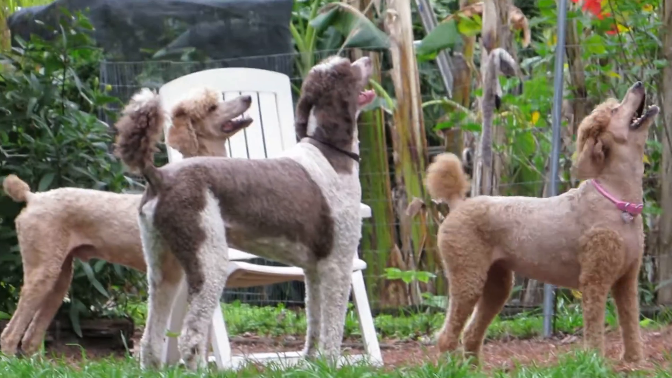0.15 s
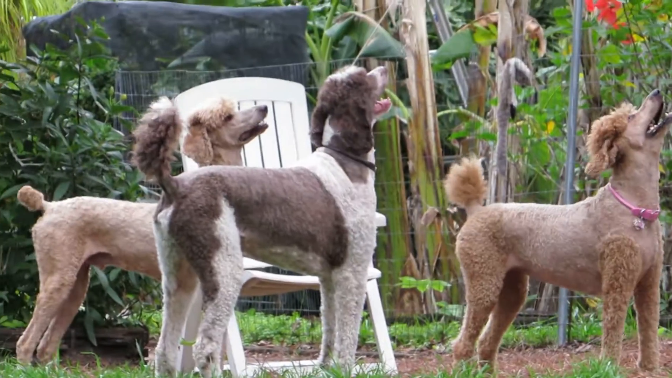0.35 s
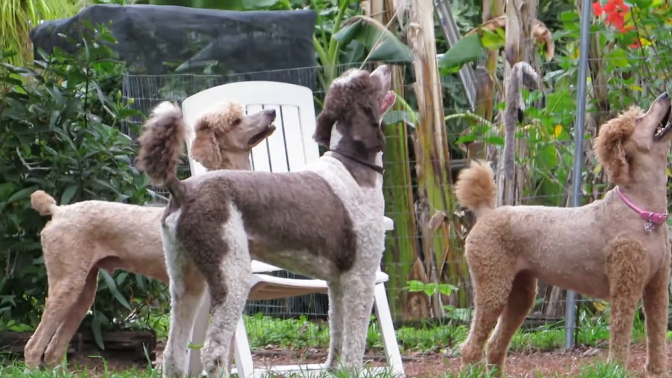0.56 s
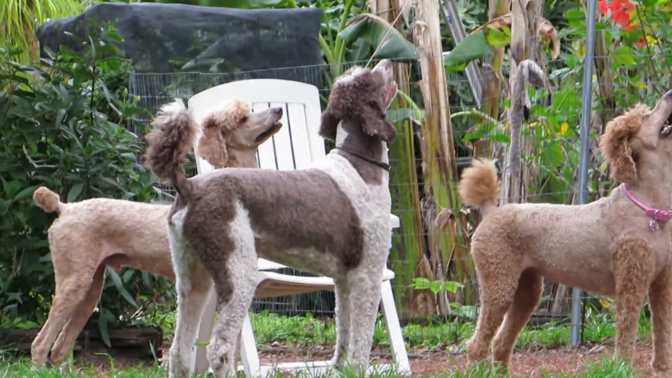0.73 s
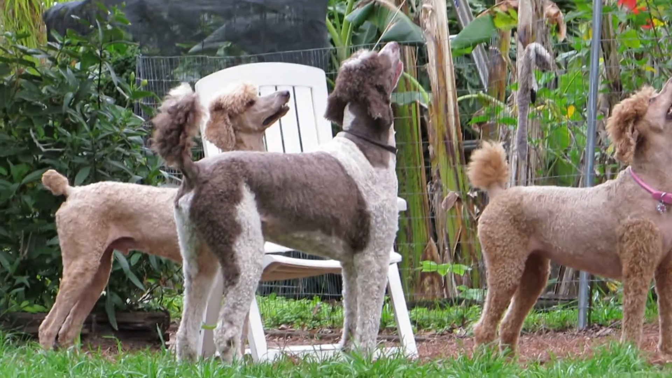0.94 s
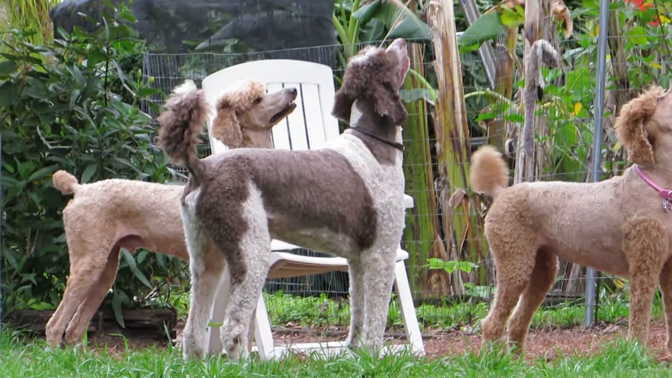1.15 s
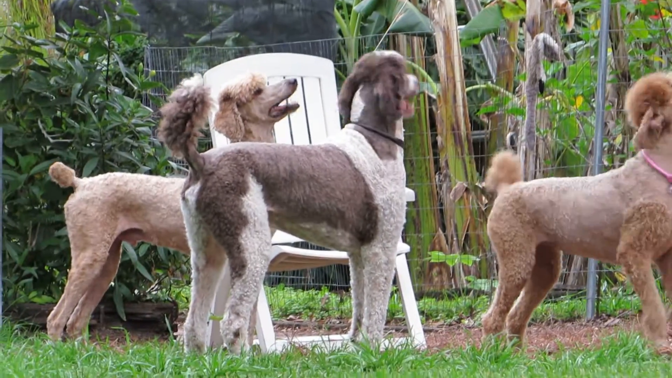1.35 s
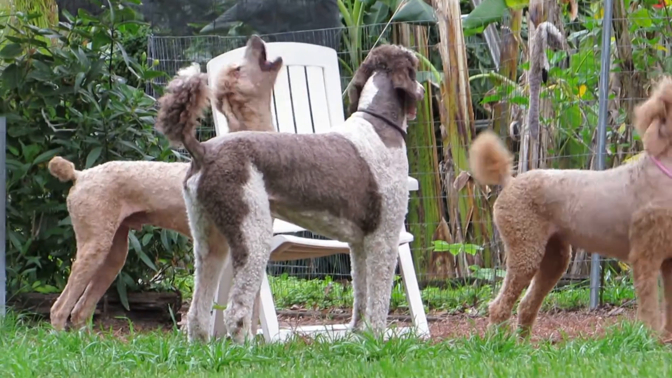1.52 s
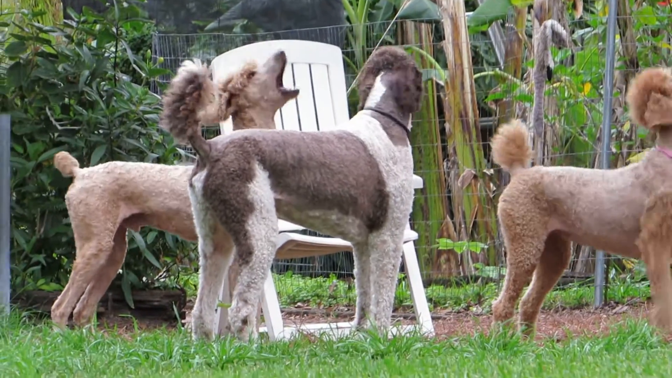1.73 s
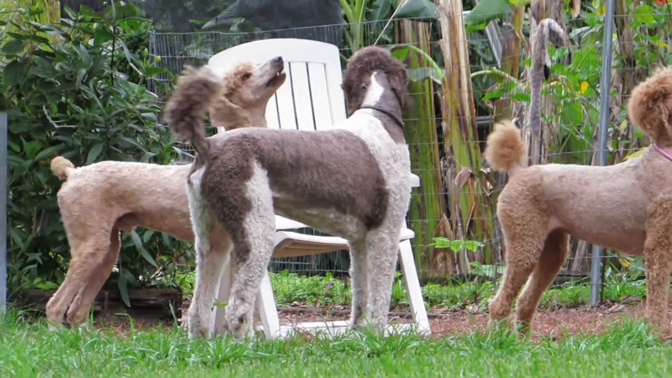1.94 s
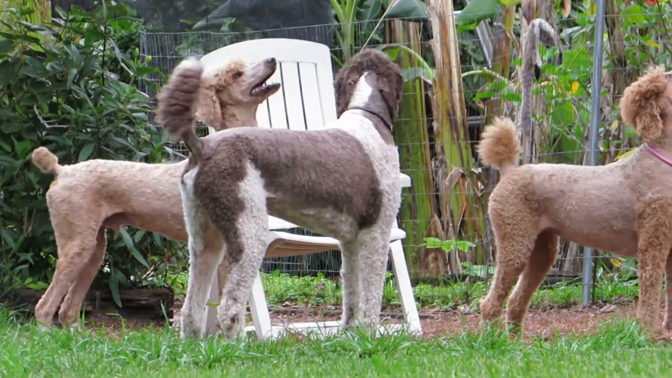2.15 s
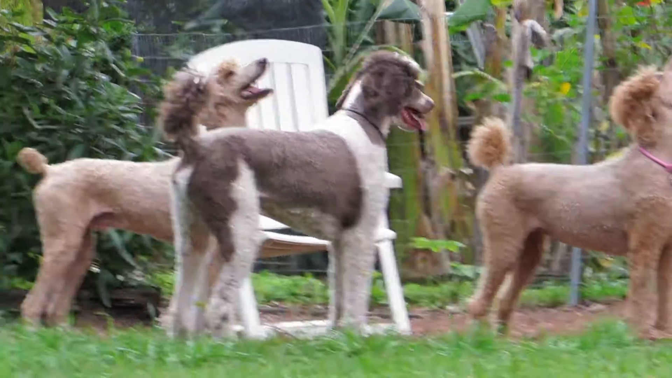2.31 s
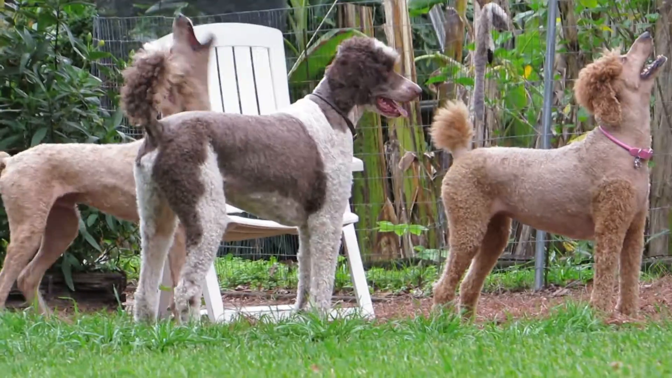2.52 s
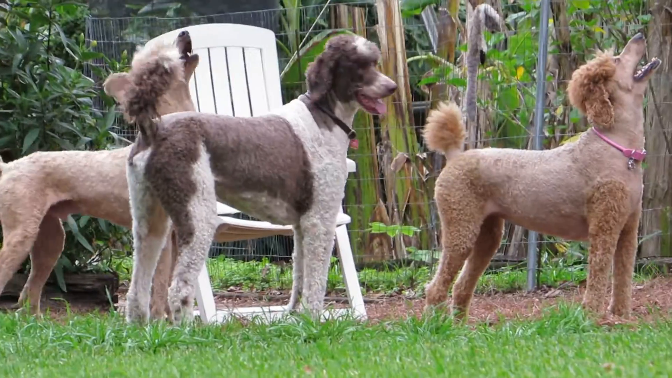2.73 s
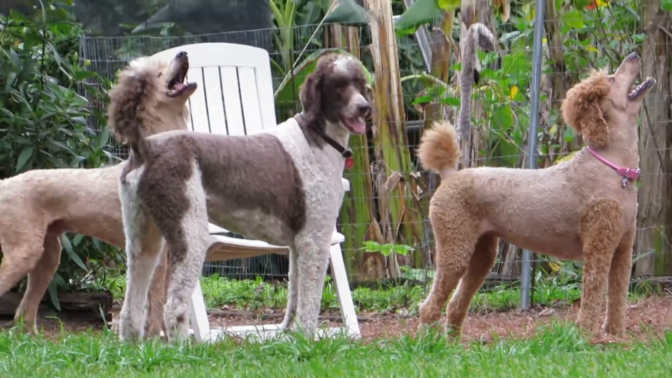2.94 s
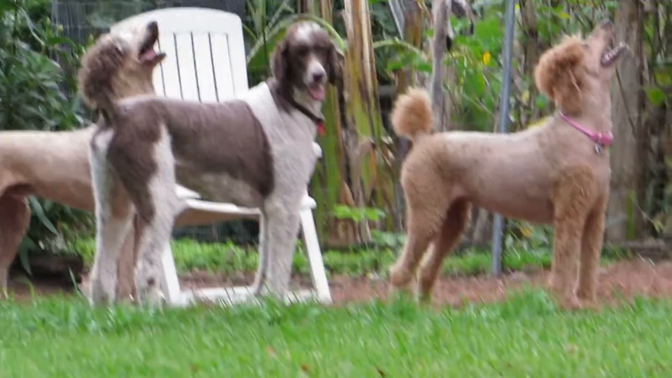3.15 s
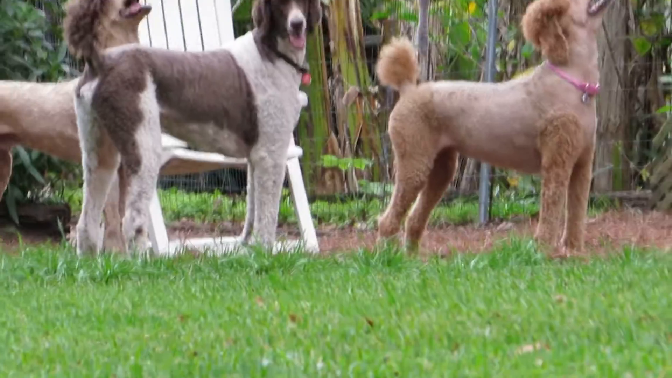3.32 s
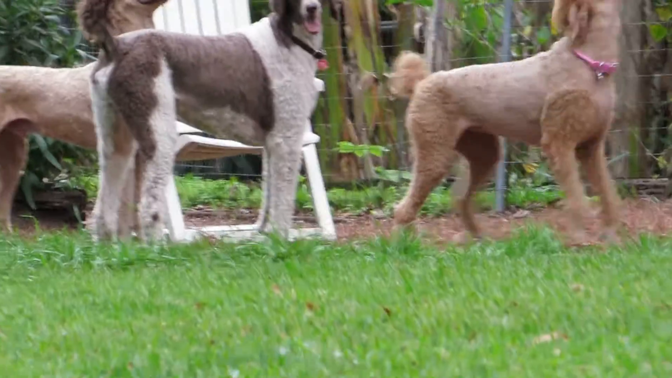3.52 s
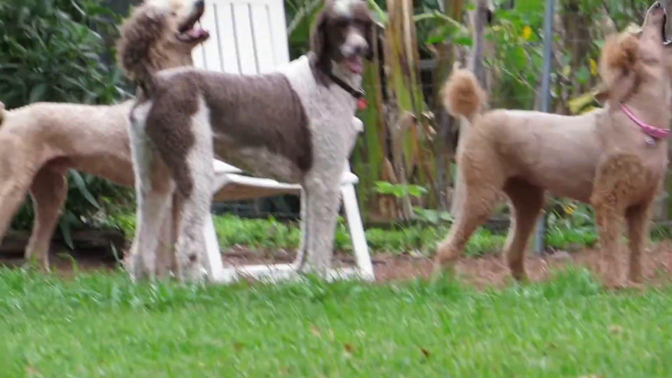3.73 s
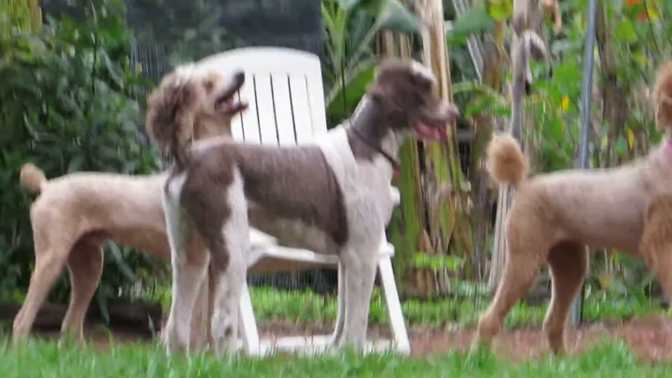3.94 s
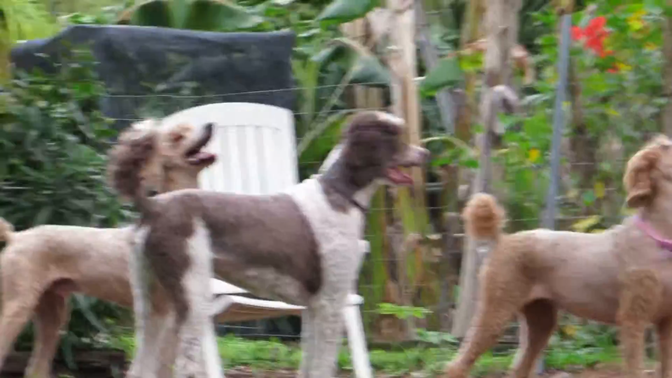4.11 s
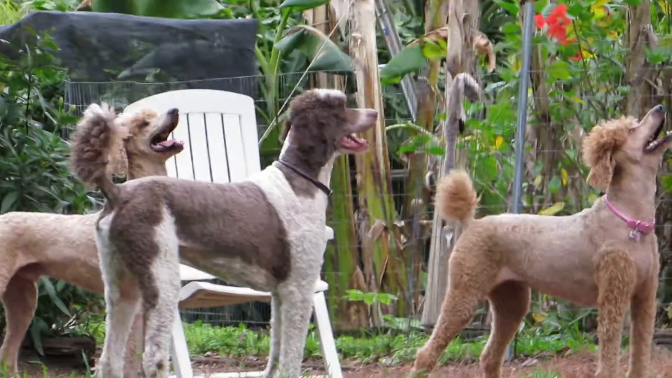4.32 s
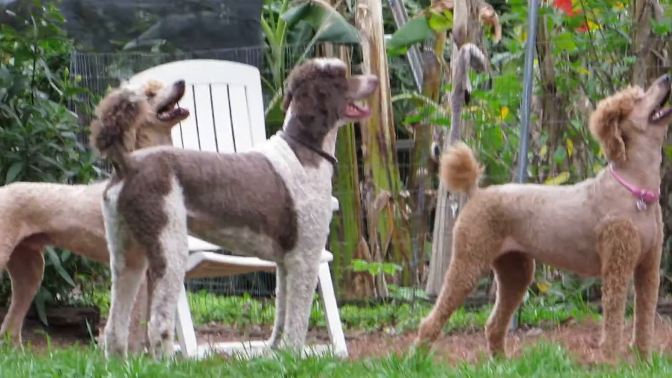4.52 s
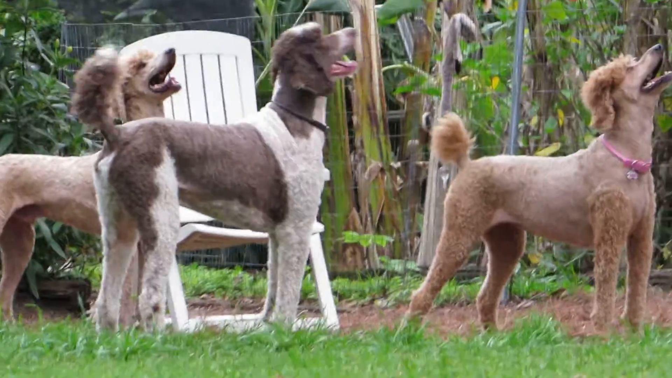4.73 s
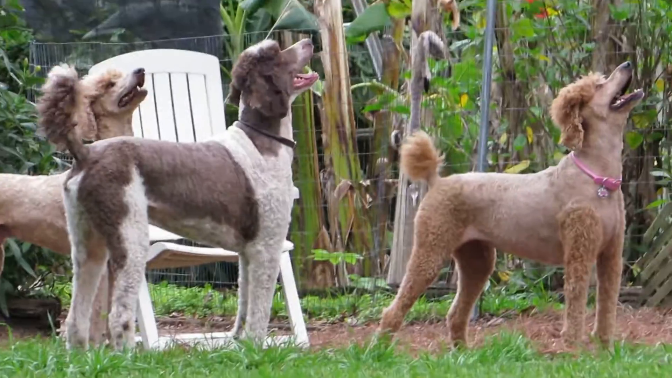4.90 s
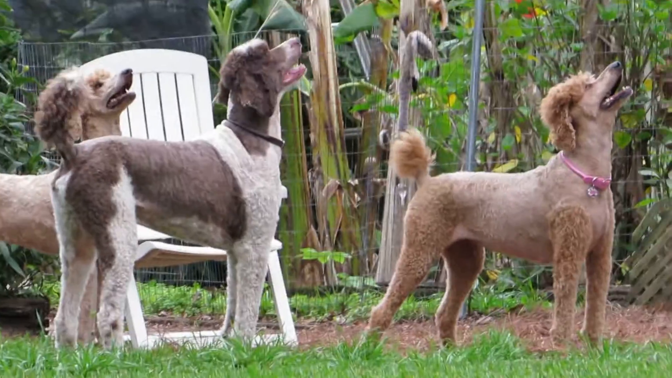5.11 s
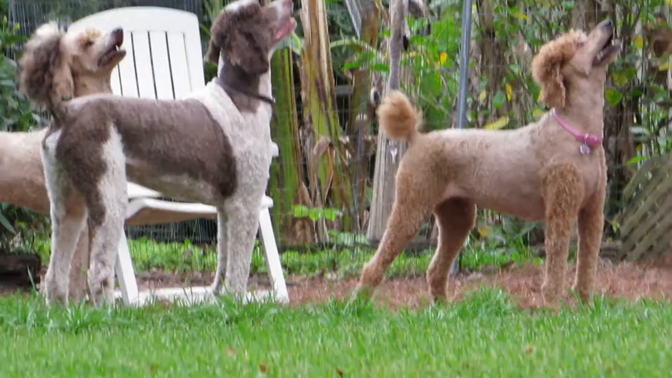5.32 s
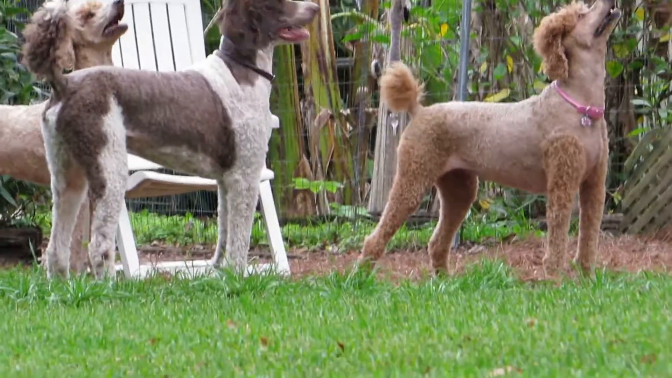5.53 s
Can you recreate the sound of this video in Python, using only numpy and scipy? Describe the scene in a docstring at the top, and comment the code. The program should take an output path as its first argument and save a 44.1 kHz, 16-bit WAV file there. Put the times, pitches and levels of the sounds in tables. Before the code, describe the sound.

A few short barks and yelps from dogs outdoors, with squeaky whining, faint bird chirps and far traffic behind.

```python
"""A fenced garden: small dogs give hoarse barks, high yelps and thin nasal whines, with a few knocks.
Barks and yelps are uneven vocal-fold pulses shaped by the throat; whines are gliding whistles.
Fences and house walls throw the calls back. Behind them: a far engine, traffic, leaves, a breeze,
insects and a songbird. Automatic gain control ducks on the loud calls and recovers slowly."""
import sys
import numpy as np
from scipy import signal
from scipy.fft import rfft, irfft, next_fast_len
from scipy.io import wavfile
from scipy.ndimage import uniform_filter1d, map_coordinates

SR = 44100
rng = np.random.default_rng(int(sys.argv[2]) if len(sys.argv) > 2 else 0)


def digitize_waveform(pressure):
    """Quantize a signal to 16-bit integers and store it at the path in sys.argv[1].

    Rows of a 2-D input are taken as channels; values are limited to [-1, 1].
    """
    field = np.atleast_2d(pressure).T
    bounded = np.clip(field, -1, 1)
    quanta = np.round(bounded * 32767).astype(np.int16)
    wavfile.write(sys.argv[1], SR, quanta)


N = 245195
TIME_S = np.arange(N) / SR
CUTOFF_HZ = 14700

# barks: start_s, attack_s, hold_s, level_db, climb_s, break_s, top_hz, low_hz, rough_before, rough_after
BARKS = [(-.03, .02, 0.084, -28.5, 0.019, 0.014, 580, 502.4, .5, 0.5),
         (1.285, 0.047, .05, -11.5, .037, .014, 620, 509.8, 0.89, 0.36),
         (2.554, 0.043, 0.061, -4.5, 0.03144, .045, 671.1, 573.6, 0.18, 0.87),
         (3.514, .038, .056, -9, .033, .018, 726, 531, .14, .58),
         (3.842, .046, 0.044, -12.5, .026, .014, 657, 509.2, 0.88, 0.42)]
# mouth resonances, one list per bark: centre_hz, width_hz, boost_db
BARK_MOUTHS = [
    [(546, 47, 8), (912, 53, 16.5), (1554, 36, 15), (5000, 900, 0)],
    [(955, 110, 12.5), (1620, 65, 2), (1910, 170, 6), (5200, 550, 7.5)],
    [(647, 90, 9.5), (1086, 82, 17.5), (1453, 234, 20), (1950, 250, 2.5), (2797, 62, 16), (4640, 1020, 17),
     (11770, 3000, 9.5)],
    [(500, 120, -6), (746, 110, 0), (990, 180, 16), (1980, 1100, 2.5), (5400, 660, 6)],
    [(934, 62, 15), (1577, 60, 7), (2860, 140, 7), (4970, 260, 10)],
]
# throat response in a bark: freq_hz, gain_db
BARK_THROAT = [(350, -41), (425, -12.5), (500, -8.5), (700, -1), (1100, 0.5), (1600, -0.5), (2150, -1.5),
               (2550, -13.5), (2900, -18), (3700, -33), (5000, -30.5), (6500, -33.5), (8500, -44.5),
               (10500, -44.5), (14000, -55)]
# engine firing tone: time_s, level_db
FIRING_LEVEL = [(0.03, -35.5), (0.29, -51.5), (0.5, -31.5), (0.63, -42), (1.09, -31.5), (1.19, -44),
                (1.44, -33), (1.72, -50), (1.84, -43), (2.11, -45.5), (2.31, -36), (2.6, -44), (3.4, -39),
                (3.51, -33), (3.58, -38), (3.87, -37), (4.21, -56), (4.56, -34), (5.02, -38), (5.07, -59),
                (5.1, -33), (5.53, -34)]
# octave of the firing tone: time_s, level_db
OCTAVE_LEVEL = [(0.03, -45), (0.21, -62), (0.29, -47), (1.5, -38.5), (1.7, -47), (2.54, -38), (2.59, -39.5),
                (2.8, -61), (3.14, -44), (4.49, -51), (5.13, -39.5), (5.38, -49.5), (5.53, -36.5)]
# open-air spectrum: freq_hz, gain_db
AIR_SPECTRUM = [(25, -5), (60, 1.5), (110, 7), (190, -3), (400, -11), (800, -4), (1400, -10.5), (2000, -16),
                (3000, -18.5), (5000, -26), (7500, -28.5), (10500, -31), (12500, -36.5), (14500, -45)]
# left-right likeness of the open air: freq_hz, coherence
AIR_COHERENCE = [(30, 0.33), (90, .75), (250, 0.06), (900, 0.42), (2000, 0.37), (4000, 0.073),
                 (9000, 0.032)]
# far traffic swell: time_s, level_db
TRAFFIC_LEVEL = [(0, -61), (.9, -54), (1.35, -46.5), (1.8, -55), (2.4, -48.5), (3.0, -55), (3.9, -48.5),
                 (4.3, -54), (4.75, -43), (5.1, -50), (5.56, -55.5)]
# songbird chirps: start_s, length_s, first_hz, last_hz, level_db
CHIRPS = [(0.142, 0.057, 3810, 3480, -50.5), (0.246, 0.049, 3860, 3670, -53),
          (0.54, 0.034, 2977, 3260, -56), (0.603, 0.073, 3350, 3610, -59), (0.937, 0.09, 2967, 3410, -56),
          (2.392, 0.039, 3694, 3460, -52), (3.162, 0.12, 3740, 3230, -51.5)]
# yelps: start_s, attack_s, hold_s, level_db, sag_db_per_s, glide_s,
# first_hz, held_hz, last_hz, onset_rough, overtones_db
YELPS = [(1.526, 0.044, 0.036, -7.5, 26, 0.082, 896, 1387, 1363, 0.6, -3),
         (1.816, .04, .03, -12, 62, .054, 1174, 1424, 1368, 0, -1),
         (4.69, .032, .06, -19, 110, 0.0694, 1372, 1363, 1227, 0.02, 3)]
# throat response in a yelp: freq_hz, gain_db
YELP_THROAT = [(350, -54), (620, -1), (850, -2.5), (1200, 7.5), (1500, 8), (1800, -6), (2300, 6.5),
               (2750, -26), (3700, -26), (4900, -27), (7000, -32), (9500, -45.5), (13500, -44.5)]
# whines: start_s, rise_s, fall_s, first_hz, middle_hz, last_hz, level_db, overtones_db
WHINES = [(1.755, 0.044, 0.043, 2190, 2200, 2280, -51.5, 3.5),
          (1.899, 0.044, 0.029, 3410, 3365, 3200, -61.5, 12.5),
          (1.914, 0.016, .035, 3370, 2890, 2590, -43.5, -15),
          (2.05, 0.022, 0.044, 3876, 3730, 3520, -52, -11),
          (2.06, 0.013, 0.028, 1268, 1221, 1150, -37.5, -11),
          (2.126, 0.023, 0.06, 1130, 1080, 917, -32.5, -7),
          (2.15, 0.023, 0.025, 3370, 3150, 2550, -43.5, -22),
          (2.457, .03, 0.047, 2800, 2920, 2700, -65.5, 10),
          (2.968, 0.019, 0.015, 2800, 2630, 2566, -50, -22),
          (3.221, 0.018, 0.029, 2550, 2776, 2640, -41.5, -13),
          (3.733, 0.049, 0.035, 2940, 2840, 2820, -31, -15), (4.34, .065, 0.062, 2697, 3100, 3640, -37, -7),
          (4.458, 0.019, .05, 3730, 3400, 2704, -35, -5), (4.599, 0.049, 0.038, 2550, 2693, 2810, -42, -10),
          (4.635, 0.069, 0.074, 3480, 3480, 3315, -54.5, 9.5),
          (4.689, 0.047, 0.079, 2720, 2740, 2520, -55, 2), (4.784, .02, .02, 2826, 3200, 3800, -36.5, -22),
          (4.804, 0.026, 0.025, 3340, 3160, 2620, -44, -10),
          (4.809, 0.058, 0.14, 2720, 2510, 2420, -53, -1), (5.1, 0.029, .02, 2330, 2410, 2890, -47, -16),
          (5.39, 0.043, 0.045, 2600, 2420, 2040, -53, -27)]
# overtone balance of a whine: harmonic, gain_db
WHINE_OVERTONES = [(2, -1), (3, -18), (4, -18.5)]
# knocks, snaps and ticks from the dogs: start_s, level_db, ring_hz, width_hz, t60_s
KNOCKS = [(1.995, -37.5, 228, 120, 0.25), (3.853, -23, 1317, 1500, 0.0065), (3.87, -41, 8400, 9000, 0.011),
          (4.212, -40.5, 6850, 8900, 0.008), (4.257, -56, 6044, 7000, 0.009)]
# sharp reflections: delay_s, level_db, left_minus_right_db
ECHOES = [(.0042, -26, 26), (.017, -13.5, 7), (0.03, -13.5, -6), (.066, -15, -5.5), (0.096, -33, -3.5)]
# scatter from fences, house and far gardens: delay_s, level_db, build_s, t60_s
SCATTER = [(.003, -6, 0.0021, 0.31), (0.068, -13, 0.0021, 0.63), (.2, -28.5, .05, 1.36)]
# scatter spectrum: freq_hz, gain_db
SCATTER_SPECTRUM = [(300, -14.5), (500, 14), (1000, -2), (1500, 4), (2500, 0.5), (5000, 3), (14000, 9.5)]
# left-right likeness of the scatter: freq_hz, coherence
SCATTER_COHERENCE = [(400, 0.65), (1500, 0.8), (3000, 0.71), (6000, 0.41), (14000, .1)]
# microphone notches: centre_hz, width_hz
MIC_NOTCHES = [(3960, 300), (7930, 190)]


def from_db(db):
    """Decibels to gain."""
    return 10 ** (np.asarray(db) / 20)


def pan(left_db):
    """Stereo gains: left up by left_db, right down by as much."""
    return from_db([[left_db], [-left_db]])


def unit_rms(x):
    """Scale to rms 1."""
    return x / np.sqrt(np.mean(x ** 2) + 1e-20)


def over_time(points):
    """A (time_s, value) table, read at every sample."""
    return np.interp(TIME_S, *np.transpose(points))


def over_bins(points, n):
    """A (freq_hz, value) table, read on a log axis at the FFT bins of n samples."""
    freq_hz, value = np.transpose(points)
    bin_hz = np.arange(n // 2 + 1) * SR / n
    return np.interp(np.log(bin_hz + 1), np.log(freq_hz), value)


def colour(x, spectrum):
    """Filter by a (freq_hz, gain_db) table."""
    n = next_fast_len(x.shape[-1] + 2048)
    return irfft(rfft(x, n) * from_db(over_bins(spectrum, n)), n)[..., :x.shape[-1]]


def drift(n, rate_hz):
    """Smooth random curve, spread about 1."""
    place = np.arange(n) * rate_hz / SR
    return map_coordinates(rng.standard_normal(int(place[-1]) + 3), [place], order=3, mode="nearest")


def phase_of(pitch_hz):
    """Running phase in radians."""
    return 2 * np.pi * np.cumsum(pitch_hz) / SR


def resonance(x, hz, width_hz):
    """Two-pole resonator, peak gain 1."""
    r = np.exp(-np.pi * width_hz / SR)
    feedback = [1, -2 * r * np.cos(2 * np.pi * hz / SR), r * r]
    return signal.lfilter(np.array([1, 0, -1]) * (1 - r * r) / 2, feedback, x)


def stereo_noise(n, coherence):
    """White noise at two close microphones; likeness varies with frequency."""
    size = next_fast_len(n)
    mid, side = rfft(rng.standard_normal((2, size)))
    alike = over_bins(coherence, size)
    spectra = np.sqrt((1 + alike) / 2) * mid + np.sqrt((1 - alike) / 2) * side * [[1], [-1]]
    return irfft(spectra, size)[:, :n]


def fade(x):
    """Taper 3 ms at each end."""
    return x * signal.windows.tukey(len(x), min(1, .006 * SR / len(x)))


def at_level(x, level_db):
    """Flatten the running rms, then apply level_db."""
    power = uniform_filter1d(x ** 2, int(.012 * SR))
    return fade(x / np.sqrt(power + 1e-12)) * from_db(level_db)


def call_span(start_s, length_s):
    """A call's slice and its age_s at each sample."""
    span = slice(max(0, int(start_s * SR)), int((start_s + length_s) * SR))
    return span, np.maximum(TIME_S[span] - start_s, 0)


def breath_db(age_s, attack_s, hold_s, sag_db_per_s, release_s, shudder_db=2):
    """Breath pressure builds as a power of time, sags, shudders and is let go."""
    rise_db = 20 * np.log10(np.clip(age_s / attack_s, 1e-3, 1) ** 1.39)
    sag_db = sag_db_per_s * np.maximum(age_s - attack_s, 0)
    release_db = 18.5 * np.maximum(age_s - attack_s - hold_s, 0) / release_s
    return rise_db - sag_db - release_db + shudder_db * drift(len(age_s), 111.5)


def vocal_folds(pitch_hz, rough, jitter, shimmer, doubling, rasp, overtones_db=0):
    """Strain (rough, 0-1) makes cycles uneven, alternately strong and weak, and leaks puffs of air."""
    n = len(pitch_hz)
    phase = phase_of(pitch_hz * (1 + jitter * rough * drift(n, 492.3)))
    smear_rad = rng.uniform(0, 2 * np.pi, size=32)   # throat and muzzle delay each overtone differently
    tone = sum(np.cos(k * phase + smear_rad[k]) * (k * pitch_hz < CUTOFF_HZ)
               * from_db(overtones_db * (k > 1)) for k in range(1, 32))
    unevenness = shimmer * drift(n, 698.4) + doubling * np.cos(phase / 2)
    tone *= np.sqrt(4 * pitch_hz / SR) * (1 + rough * unevenness)
    puffs = rng.standard_normal(n) * (1 + np.cos(phase) / 2) * from_db(overtones_db)
    teeth_hiss = colour(puffs, [(2000, .5), (4500, -2), (8000, 6.5)])
    return tone * np.sqrt(1 - rough ** 2 / 2) + rough * (rasp * puffs + teeth_hiss)


def barks(sag_db_per_s=78, release_s=.014, fall_hz_per_s=308, jaw_drop_s=.037, brightening=.41):
    """Hoarse pulses through throat and opening mouth; treble grows with effort."""
    out = np.zeros(N)
    for bark, mouth in zip(BARKS, BARK_MOUTHS):
        start_s, attack_s, hold_s, peak_db, climb_s, break_s, top_hz, low_hz, *rough_ends = bark
        span, age_s = call_span(start_s, attack_s + hold_s + release_s)
        level_db = peak_db + breath_db(age_s, attack_s, hold_s, sag_db_per_s, release_s)
        # pitch climbs, breaks to a lower note, then sinks with the breath
        climb = .72 + .28 * np.sin(np.pi / 2 * np.minimum(age_s / climb_s, 1))
        broken = np.clip((age_s - climb_s) / break_s, 0, 1)
        sink_hz = fall_hz_per_s * np.maximum(age_s - climb_s - break_s, 0)
        pitch_hz = top_hz * climb + (low_hz - top_hz) * broken - sink_hz
        rough = np.interp(broken, [0, 1], rough_ends)
        pulses = vocal_folds(pitch_hz, rough, jitter=.11, shimmer=.7, doubling=.55, rasp=.6)
        voice = colour(pulses, BARK_THROAT)
        opening = np.interp(age_s, [0, jaw_drop_s], [.42, 1]) ** 2
        for hz, width_hz, boost_db in mouth:
            voice += (from_db(boost_db * opening) - 1) * resonance(voice, hz, width_hz)
        treble = colour(voice, [(1800, -60), (2150, -10), (2450, 0)])
        effort_db = np.minimum(level_db - np.percentile(level_db, 60), 0)
        voice += (from_db(brightening * effort_db) - 1) * treble
        out[span] += at_level(voice, level_db)
    return out


def engine(firing_hz=70.1, wander=.01068, flutter_db=1.5):
    """Far idle: only the lowest orders carry, fading and fluttering in the moving air."""
    phase = phase_of(firing_hz * (1 + wander * drift(N, 4)))
    hum = np.zeros(N)
    for order, level_db in [(1, over_time(FIRING_LEVEL)), (1.5, -48), (2, over_time(OCTAVE_LEVEL))]:
        gain = from_db(level_db + flutter_db * drift(N, 16))
        hum += gain * np.sin(order * phase + .46 * drift(N, 5.4))
    return np.sqrt(2) * hum * pan(1.5)


def air(level_db=-40, swell_db=.35):
    """Soft wash of far traffic and leaves."""
    wash = unit_rms(colour(stereo_noise(N, AIR_COHERENCE), AIR_SPECTRUM))
    return wash * from_db(level_db + swell_db * drift(N, 4.5)) * pan(.7)


def traffic():
    """Dull swells from beyond the houses."""
    spectrum = [(120, -44), (220, -7.5), (330, -9), (480, -21.5), (1500, -52), (8000, -83)]
    rumble = unit_rms(colour(stereo_noise(N, AIR_COHERENCE), spectrum))
    return rumble * from_db(over_time(TRAFFIC_LEVEL)) * pan(2)


def breeze(level_db=-54, gust_db=2.5):
    """Light gusty rumble on each microphone port."""
    spectrum = [(10, -4), (25, 11.5), (45, 12), (120, -30), (600, -69)]
    rumble = unit_rms(colour(rng.standard_normal((2, N)), spectrum))
    return rumble * from_db(level_db + gust_db * drift(N, 3)) * pan(1)


def insects(centre_hz=10500, width_hz=600, level_db=-71):
    """Faint, even shrill from the hedge."""
    return from_db(level_db) * unit_rms(resonance(rng.standard_normal((2, N)), centre_hz, width_hz))


def songbird(warble=.035):
    """Short warbled glides, far off."""
    out = np.zeros(N)
    for start_s, length_s, first_hz, last_hz, level_db in CHIRPS:
        start, n = int(start_s * SR), int(length_s * SR)
        pitch_hz = np.linspace(first_hz, last_hz, n) * (1 + warble * drift(n, 161))
        out[start:start + n] += from_db(level_db) * np.hanning(n) * np.sin(phase_of(pitch_hz))
    return out


def yelps(tremor=.0095, clear_s=.0364, release_s=.053):
    """Folds in a high register: onset roughness clears to a gliding tone; tremor smears the overtones."""
    out = np.zeros(N)
    for (start_s, attack_s, hold_s, peak_db, sag_db_per_s, glide_s,
         *contour_hz, onset_rough, overtones_db) in YELPS:
        length_s = attack_s + hold_s + release_s
        span, age_s = call_span(start_s, length_s)
        level_db = peak_db + breath_db(age_s, attack_s, hold_s, sag_db_per_s, release_s)
        pitch_hz = np.interp(age_s, [0, glide_s, length_s], contour_hz)
        pitch_hz *= 1 + tremor * drift(len(age_s), 900)
        rough = .033 + onset_rough * np.exp(-(age_s / clear_s) ** 2)
        pulses = vocal_folds(pitch_hz, rough, jitter=.13, shimmer=.5, doubling=.9, rasp=.7,
                             overtones_db=overtones_db)
        out[span] += at_level(colour(pulses, YELP_THROAT), level_db)
    return out


def whines(edge_db=13, rush_db=-21):
    """Thin whistles through the nose that swell, waver and catch, with a little rush of air."""
    rush_spectrum = [(1500, -22), (3200, 4), (7000, 1.5), (9000, -5), (13000, -7)]
    out = np.zeros(N)
    for start_s, rise_s, fall_s, *contour_hz, peak_db, overtones_db in WHINES:
        span, age_s = call_span(start_s, rise_s + fall_s)
        n = len(age_s)
        arch = np.interp(age_s, [0, rise_s, rise_s + fall_s], [-1, 0, 1])
        pitch_hz = np.interp(arch, [-1, 0, 1], contour_hz)
        waver = .009 * drift(n, 130) + .016 * drift(n, 700)
        catch_db = 2.5 * drift(n, 110)
        phase = phase_of(pitch_hz * (1 + waver))
        overtones = sum(from_db(gain_db) * np.sin(k * phase) for k, gain_db in WHINE_OVERTONES)
        whistle = np.sin(phase) + from_db(overtones_db) * overtones
        rush = unit_rms(colour(rng.standard_normal(n), rush_spectrum))
        whistle += from_db(rush_db + max(overtones_db, 0)) * rush
        out[span] += fade(whistle) * from_db(peak_db - edge_db * arch ** 2 + catch_db)
    return out


def knocks():
    """Each contact: a dying noise burst in one steep resonance."""
    out, age_s = np.zeros(N), TIME_S[:SR // 4]
    for start_s, level_db, ring_hz, width_hz, t60_s in KNOCKS:
        start, n = int(start_s * SR), len(age_s)
        band = resonance(rng.standard_normal(n), ring_hz, width_hz)
        burst = unit_rms(resonance(band, ring_hz, width_hz))
        attack = 1 - np.exp(-age_s * ring_hz)   # builds in about one cycle
        out[start:start + n] += burst * attack * from_db(level_db - 60 * age_s / t60_s)
    return out


def garden_echoes(x, length_s=1.3):
    """A few sharp echoes and waves of scatter from ever farther walls."""
    n = int(length_s * SR)
    power = np.zeros(n)
    for delay_s, level_db, build_s, t60_s in SCATTER:
        age_s = np.maximum(TIME_S[:n] - delay_s, 0)
        shape = ((1 - np.exp(-age_s / build_s)) * from_db(-60 * age_s / t60_s)) ** 2
        power += from_db(level_db) ** 2 * shape / shape.sum()
    response = np.sqrt(power) * colour(stereo_noise(n, SCATTER_COHERENCE), SCATTER_SPECTRUM)
    for delay_s, level_db, left_minus_right_db in ECHOES:
        response[:, int(delay_s * SR)] += from_db(level_db) * pan(left_minus_right_db / 2)[:, 0]
    return signal.fftconvolve(x[None], response, axes=1)[:, :N]


def scene():
    """Dogs ahead, the bird with more echo, over the steady background."""
    dogs = barks() + yelps() + knocks() + whines()
    bird = songbird()
    calls = dogs + bird + garden_echoes(dogs + 2 * bird)
    return calls * pan(.3) + engine() + air() + traffic() + breeze() + insects()


def record(dry, threshold_db=-12, slope=.63, release_db_per_s=9.5):
    """Gain control ducks on loud calls and recovers slowly; then treble notches, clipping, low-pass."""
    power = uniform_filter1d(np.mean(dry ** 2, axis=0), 256)
    level_db = 10 * np.log10(np.abs(power) + 1e-12)
    wanted_db = np.maximum(level_db - threshold_db, 0) * slope
    recovery_db = release_db_per_s * TIME_S
    duck_db = np.maximum.accumulate(wanted_db + recovery_db) - recovery_db
    out = dry * from_db(-uniform_filter1d(duck_db, 256))
    for centre_hz, width_hz in MIC_NOTCHES:
        edges_hz = [centre_hz - width_hz / 2, centre_hz + width_hz / 2]
        out = signal.sosfilt(signal.butter(2, edges_hz, "bandstop", fs=SR, output="sos"), out)
    lowpass = signal.ellip(10, .2, 90, CUTOFF_HZ, fs=SR, output="sos")
    return signal.sosfilt(lowpass, np.clip(out, -.95, .95))


dry = scene()
out = record(dry)
digitize_waveform(out)
```